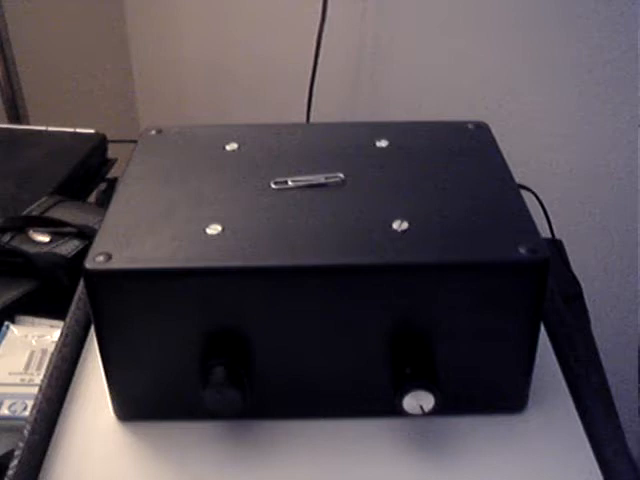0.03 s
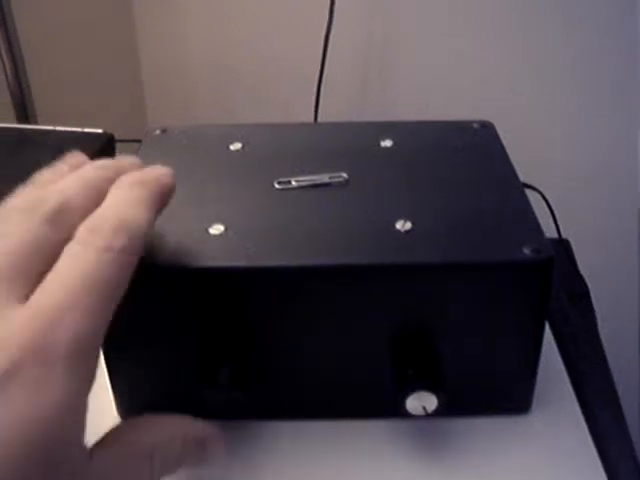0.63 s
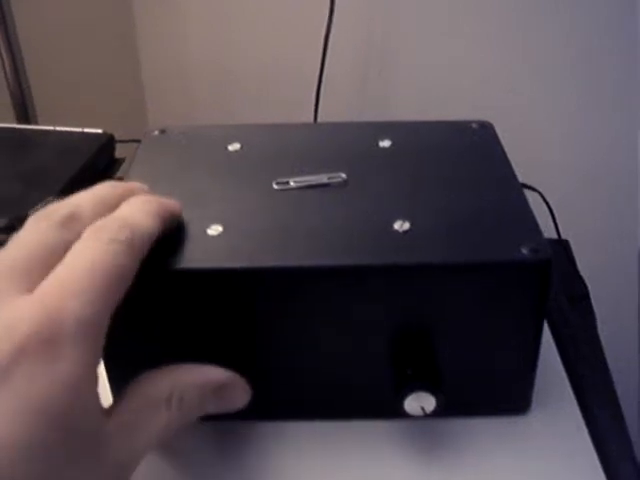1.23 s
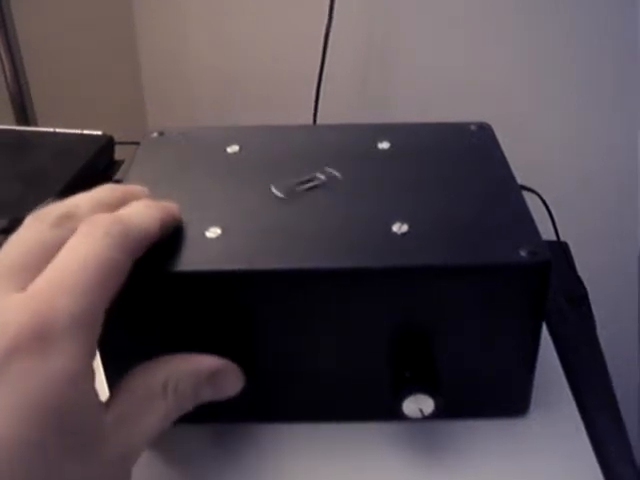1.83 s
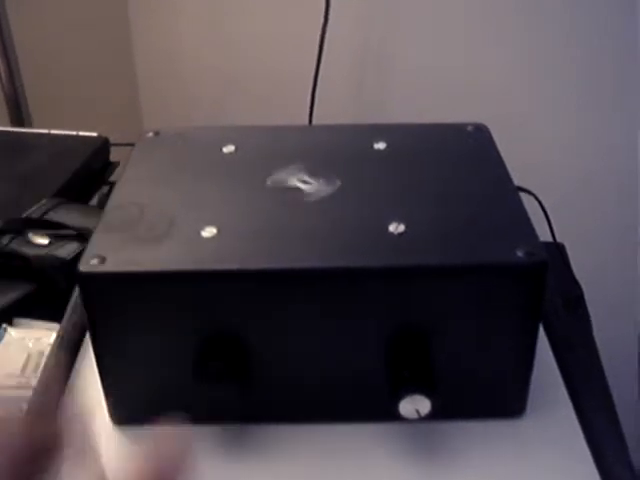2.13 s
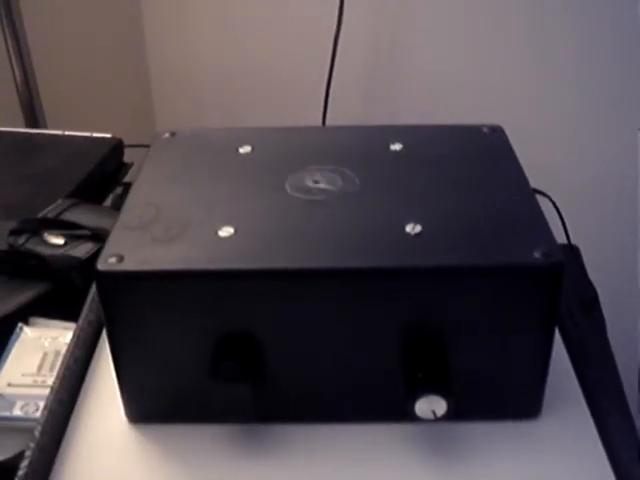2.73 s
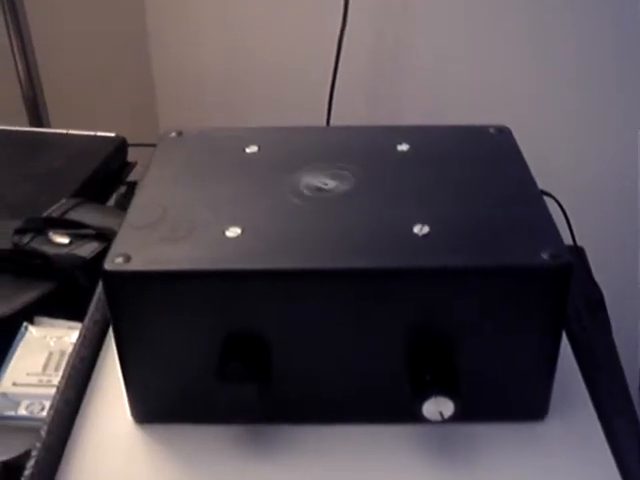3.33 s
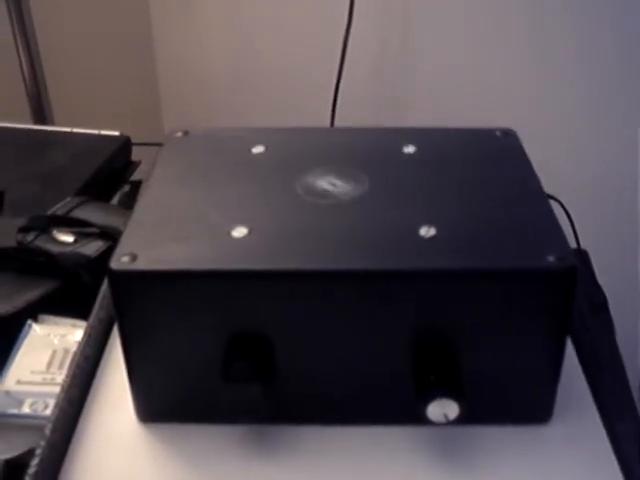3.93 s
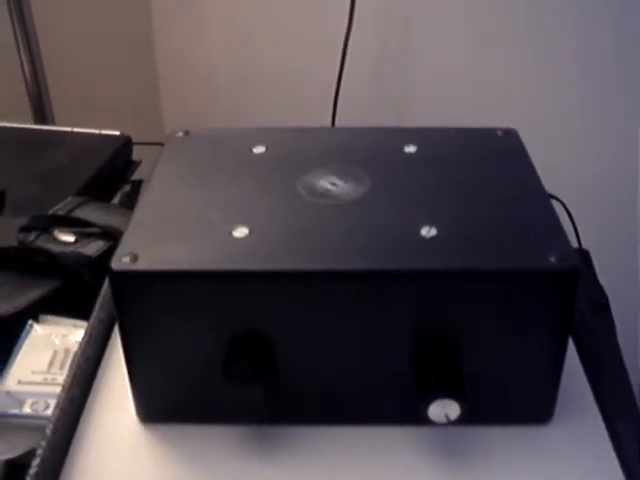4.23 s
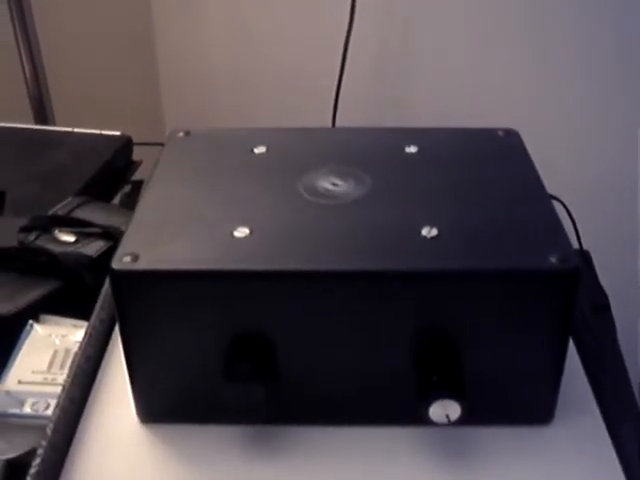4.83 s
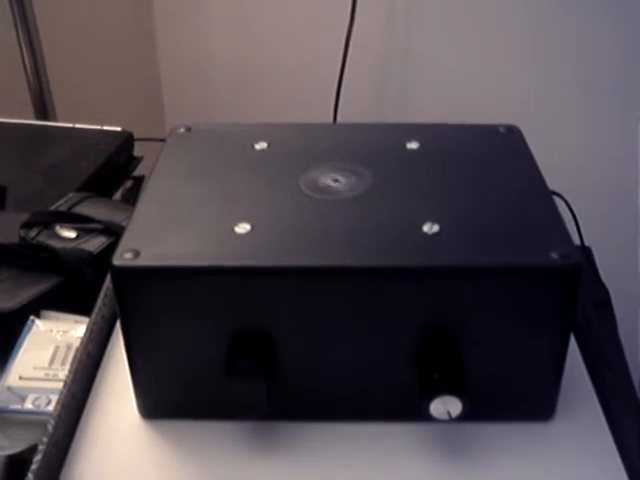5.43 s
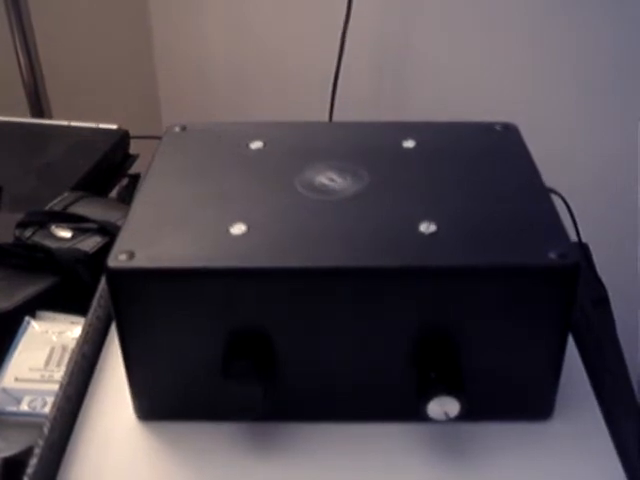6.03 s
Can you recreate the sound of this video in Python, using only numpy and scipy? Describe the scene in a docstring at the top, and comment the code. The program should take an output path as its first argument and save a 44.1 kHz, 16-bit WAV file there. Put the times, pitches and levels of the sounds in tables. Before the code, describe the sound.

A paper clip spins on a plastic box, heard through one close microphone in a small room. At first there is only fan hum, a faint knock and a brief whine. A sharp switch click starts the clip sticking and slipping, and a dull bump on the desk follows. The clip speeds up into a fluttering metallic chatter, with a passing high ring, then settles into a fast, even rattle.

```python
"""A fan and mains hum fill a small room; the desk takes a faint knock and a whine swells and fades.
Fingers brush the knob of a home-made magnetic stir plate and switch it on with a click.
A steel paper clip sticks and slips on the plastic lid, then spins free as a hand bumps the desk.
Faster and faster it scrapes and chatters into the lid's resonances, its sound swinging twice a turn,
with a high zing that comes and goes on the way up. One mono microphone stands close by."""
import sys
import numpy as np
from scipy import signal
from scipy.fft import rfft, irfft, next_fast_len
from scipy.io import wavfile
from scipy.ndimage import map_coordinates

SR = 44100
rng = np.random.default_rng(int(sys.argv[2]) if len(sys.argv) > 2 else 0)


def waveform_to_disk(signal):
    """Save audio, clipped to [-1, 1], as 16-bit WAV at the path in sys.argv[1]."""
    frames = np.transpose(np.atleast_2d(signal))
    scaled = np.clip(frames, -1, 1) * 32767
    samples = np.round(scaled).astype(np.int16)
    wavfile.write(sys.argv[1], SR, samples)


N = 272538


def paper_clip():
    """The spinning clip drives the lid and rings itself, louder and brighter as it gathers speed."""
    # Resonances of lid and box. Each row: pitch in Hz, width in Hz, relative level in dB.
    lid_modes = [(328, 64, -26.5), (417, 27.5, -15), (619.6, 47, -9.5), (772, 69, -12.5), (997, 52, -7),
                 (1069.5, 26.5, -4), (1136, 110, -10.5), (1347, 65, -1.07), (1484, 415, -7),
                 (1598, 83, -0.5), (1854, 67, -7.5), (2113, 110, -6.5), (2482, 175, -11.5), (2642, 51, -7),
                 (2905, 214, -7.5), (3150, 123, -5), (3307, 65, -5), (3790, 980, -13.5), (4340, 190, -8.0),
                 (4463, 86, -7.5), (4970, 550, -12), (5550, 174, -7.5), (5730, 430, -14), (6100, 84, -5.5),
                 (6580, 630, -13), (7816, 227, -8.5), (8470, 320, -9), (9460, 310, -11), (9924, 210, -9.5)]
    # Crossovers in Hz between five registers: low lid, middle lid, upper lid, scrape and fizz.
    crossovers = [1250, 2550, 3500, 7200]
    # How each register builds. Each row: full level in dB, knee in turns per second, steepness,
    # swell in dB, then the swell's centre and width in turns per second.
    builds = [(-35, 1.26, 1.1, 5.5, 8.6, 3.95), (-28.6, 3, 0.98, 3, 9.45, 4.9),
              (-29, 3.3, 1.28, 1.5, 8.9, 4.8), (-27, 3.3, 1.36, 1.2, 10.2, 3.5),
              (-29, 5.1, 1.68, 1.2, 11.2, 3.1)]
    stick_speed, free_speed = 0.44, 1.22  # turns per second
    speed = spin()
    contact = chatter(speed, slow_rate=200, per_turn=220, spread_db=2.5, scrape_db=-4)
    flutter = amp(0.34 * wobble(60))
    lid = unit(filtered(contact * flutter, lambda f: body(lid_modes, f)))
    # The steel wire has one narrow, ringing mode.
    knocks = chatter(speed, slow_rate=69, per_turn=60, spread_db=0, scrape_db=-4.5)
    wire = amp(-15) * unit(filtered(knocks, lambda f: body([(1622, 28, 0)], f)))
    rattle = turning(room(lid, wet_db=-11.5) + wire, speed)
    lowpassed = [filtered(rattle, lambda f: below(f, edge, order=24)) for edge in crossovers]
    registers = np.diff([np.zeros(N), *lowpassed, rattle], axis=0)
    sound = sum(unit(band) * rubbing(speed, *build) for band, build in zip(registers, builds))
    loose = np.interp(speed, [stick_speed, free_speed], [0, 1])
    drift = amp(0.48 * wobble(6))
    return sound * loose * drift


def spin():
    """Turns per second of magnet and clip: the motor gains speed quickly, then ever more slowly."""
    motor_on_s, top_speed, run_up_s = 1.64, 19.2, 2.76
    running_s = np.maximum(clock() - motor_on_s, 0)
    return top_speed * (1 - np.exp(-running_s / run_up_s))


def chatter(speed, slow_rate, per_turn, spread_db, scrape_db):
    """Tiny impacts of wire on plastic, denser with speed, over continuous scraping."""
    rate = slow_rate + per_turn * speed  # impacts per second
    hits = rng.random(N) < rate / SR
    impacts = hits * amp(spread_db * rng.standard_normal(N)) * rng.choice([-1, 1], N)
    scrape = amp(scrape_db) * rng.standard_normal(N)
    return unit(impacts / np.sqrt(rate)) + scrape


def turning(x, speed):
    # The swing across the spectrum. Each row: frequency in Hz, depth from 0 to 1, phase in cycles.
    swing = [(600, 0.18, -0.29), (980, 0.26, -0.44), (1360, 0.08, 0.36), (1840, 0.19, -0.023),
             (2100, 0.35, 0.1), (2860, 0.16, 0.42), (3070, 0.41, -0.094), (3330, 0.37, -0.21),
             (4020, 0.13, 0.49), (5830, 0.21, 0.06), (7040, 0.2, -0.39), (8950, 0.19, -0.05)]
    hz, depth, phase = np.transpose(swing)
    angle = 4 * np.pi * np.cumsum(speed) / SR
    lobe = lambda f: np.interp(f, hz, depth * np.exp(2j * np.pi * phase))
    in_phase = filtered(x, lambda f: lobe(f).real)
    quadrature = filtered(x, lambda f: lobe(f).imag)
    return x + np.cos(angle) * in_phase - np.sin(angle) * quadrature


def rubbing(speed, full_db, knee, steepness, swell_db, swell_speed, swell_width):
    growth = (speed / np.hypot(speed, knee)) ** steepness
    return growth * amp(full_db + swell_db * hump(speed, swell_speed, swell_width))


def drags():
    # The first slow drags. Each row: centre in seconds, length in seconds, level in dB.
    swells = [(1.803, .045, -34.5), (1.955, .06, -35.5), (2.14, .04, -33)]
    # The squeal of a drag. Each row: pitch in Hz, width in Hz, relative level in dB.
    squeal_modes = [(980, 19, 3), (1564, 35, -7), (1860, 40, -5), (2060, 50, -11), (4400, 91, -13)]
    slips = chatter(spin(), slow_rate=120, per_turn=52, spread_db=3, scrape_db=-6)
    return strokes(swells) * unit(filtered(slips, lambda f: body(squeal_modes, f)))


def zing():
    """The fast-sliding wire excites a pair of high modes, most strongly at one speed."""
    # The ringing pair. Each row: pitch in Hz, width in Hz, relative level in dB.
    zing_modes = [(5640, 200, 2), (5800, 48, -1.5)]
    speed = spin()
    ring = filtered(rng.standard_normal(N), lambda f: body(zing_modes, f))
    swell = amp(-31.5) * tent(speed, top=10.9, rise_db=7, fall_db=1.5)
    return swell * unit(turning(ring, speed))


def switch():
    """The switch snaps over in a few quick contacts: each is a bright tick and a ring of the case."""
    # The contacts. Each row: start in seconds, then relative levels of ring and tick in dB.
    contacts = [(1.5890, -21, -23), (1.5924, -18, 1), (1.5952, -1.5, -30.5), (1.5993, -19, -0.5),
                (1.611, -23, -29)]
    # Resonances of the case. Each row: pitch in Hz, width in Hz, relative level in dB.
    case_modes = [(70, 150, -27), (306, 36, -20), (560, 53, -14), (886, 57, 6.5), (1500, 61, -1),
                  (1750, 280, -3), (2310, 120, -2.5), (2490, 126, 1), (2850, 260, -3.5), (3650, 560, -10),
                  (4330, 260, -10), (5130, 280, -4.5), (5290, 380, -7), (5670, 400, -10.5)]
    # The colour of the tick. Each row: frequency in Hz, relative level in dB.
    tick_colour = [(200, -24), (2000, -3), (5000, -8), (7000, -13), (8400, 5), (10000, -17)]
    tick_t60_s = 0.0098
    t = np.arange(SR // 4) / SR
    ring = blow(lambda f: body(case_modes, f))
    rings, tick_envelope = np.zeros(N), np.zeros(N)
    for start, ring_db, tick_db in contacts:
        add(rings, start, amp(ring_db) * ring)
        add(tick_envelope, start, amp(tick_db - 60 * t / tick_t60_s))
    return room(rings, wet_db=-2.5) + room(0.54 * tick_envelope * noise(tick_colour), wet_db=-18)


def bumps():
    """Soft contacts of the hand ring only the low modes of the desk."""
    # The contacts. Each row: start in seconds, level in dB, cut-off in Hz (lower is softer).
    contacts = [(.1305, -25.5, 3950), (2.379, -20, 900), (2.382, -7, 1400), (2.3845, -14.5, 1300),
                (2.3889, -10, 800), (2.404, -21, 200), (2.428, -21, 200)]
    # Resonances of the desk. Each row: pitch in Hz, width in Hz, relative level in dB.
    desk_modes = [(152, 32, -15), (281, 49, -3), (430, 113, -2.5), (564, 123, 1.5), (864, 87, 7.5),
                  (1190, 130, -4.5), (1450, 260, 2)]
    thuds = np.zeros(N)
    for start, db, soft_hz in contacts:
        thud = blow(lambda f: body(desk_modes, f) / (1 + 1j * f / soft_hz) ** 2)
        add(thuds, start, amp(db) * thud)
    return room(thuds, wet_db=-12)


def fingers():
    """Skin slides on the knob with a faint hiss."""
    # The brushes. Each row: centre in seconds, length in seconds, level in dB.
    brushes = [(.835, .09, -52), (1.02, .07, -54)]
    return strokes(brushes) * noise([(200, -16), (1500, 1), (4000, 0.5), (10000, -8)])


def background():
    """Fan noise and hum, a fading whine, a thin high whistle and a soft low throb about twice a second."""
    # The colour of the fan's air. Each row: frequency in Hz, relative level in dB.
    air_colour = [(20, -44.5), (45, -22), (64, -14), (92, -34.5), (130, -9.5), (300, -4), (450, -5),
                  (750, -3.5), (1050, -5.5), (1380, -8.5), (1650, -15), (4000, -21.5), (6200, -28),
                  (8100, -27), (10000, -33.5)]
    # Steady tones of fan and mains. Each row: pitch in Hz, relative level in dB.
    hum_tones = [(60, -74.5), (139.5, -62.5), (175.0, -62.5), (209.0, -57.5), (278.5, -63), (288.0, -51.5),
                 (314.5, -53.5), (327.0, -60.5), (348.0, -60.5), (370.5, -59.5), (487.0, -60), (539.0, -57),
                 (552.5, -62.5), (576.0, -51), (615.5, -62), (629.0, -54), (654.5, -58.5), (686.0, -64),
                 (696.0, -61.5), (719.0, -52.5), (857.0, -61), (1258.5, -60)]
    # Whine tones that swell in turn. Each row: pitch in Hz, peak level in dB, peak time in seconds.
    whine_tones = [(824, -50, 0.68), (1112, -48.5, 0.44), (1374, -45, 0.38)]
    # The electrical whistle. Each row: pitch in Hz, level in dB.
    whistle_tones = [(7951, -83), (8008, -67.5), (8040, -75)]
    t = clock()
    air = amp(-44) * noise(air_colour)
    hum = amp(-0.5) * tones(hum_tones, waver=0.58)
    whine = sum(tent(t, peak_s, rise_db=34, fall_db=40) * tones([(hz, db)], waver=0.4)
                for hz, db, peak_s in whine_tones)
    whistle = tones(whistle_tones, waver=0.94)
    throb_hz, period_s = 68, 0.508
    beat = np.cos(np.pi * (t - 0.12) / period_s) ** 8
    throb = amp(-61) * beat * np.sin(2 * np.pi * throb_hz * t)
    return air + hum + whine + whistle + throb


def room(x, wet_db):
    """The direct sound and a short diffuse tail in which the treble dies first."""
    # The room's decay. Each row: frequency in Hz, seconds to fall by 60 dB.
    decay_times = [(150, 0.9), (1000, 0.23), (3000, 0.23), (10000, 0.18)]
    hz, t, spectra = signal.stft(rng.standard_normal(SR // 2), SR, nperseg=256)
    decay = amp(-60 * t / along(decay_times, hz)[:, None])
    tail = signal.istft(spectra * decay, SR, nperseg=256)[1]
    tail = np.pad(tail / np.linalg.norm(tail), (SR // 200, 0))  # 5 ms of pre-delay
    return x + amp(wet_db) * signal.fftconvolve(x, tail)[:N]


def tones(lines, waver):
    """Sines from (Hz, dB) rows; their level wanders a little, their phase by about waver radians."""
    return sum(amp(db + 1.94 * wobble(4)) * np.sqrt(2)
               * np.sin(2 * np.pi * hz * clock() + waver * wobble(5)) for hz, db in lines)


def noise(spectrum):
    """Noise of rms 1, coloured by (Hz, dB) points."""
    return unit(filtered(rng.standard_normal(N), lambda hz: amp(along(spectrum, hz))))


def body(modes, f):
    """Response of a set of (Hz, width in Hz, dB) resonances of alternating polarity."""
    return sum((-1) ** k * amp(db) * 1j * f * width / (hz * hz - f * f + 1j * f * width)
               for k, (hz, width, db) in enumerate(modes))


def blow(response):
    """What one short push rings, with peak 1."""
    ring = filtered(signal.unit_impulse(SR // 4), response)
    return ring / np.abs(ring).max()


def filtered(x, response):
    """Shape a sound with a complex response of frequency."""
    size = next_fast_len(len(x) + SR // 4, True)
    hz = np.fft.rfftfreq(size, 1 / SR)
    return irfft(rfft(x, size) * response(hz), size)[:len(x)]


def below(f, edge_hz, order):
    """Low-pass gain."""
    return 1 / (1 + (f / edge_hz) ** order)


def strokes(rows):
    """One soft swell for each row of centre, length and level."""
    return sum(amp(db) * hump(clock(), centre_s, length_s) for centre_s, length_s, db in rows)


def hump(x, centre, width):
    """A bell of height 1; width spans about its upper two thirds."""
    return np.exp(-(2 * (x - centre) / width) ** 2)


def tent(x, top, rise_db, fall_db):
    """A gain that climbs to 1 at x = top and falls again, by so many dB per unit of x."""
    return amp(-rise_db * np.maximum(top - x, 0) - fall_db * np.maximum(x - top, 0))


def wobble(rate):
    """A smooth random curve, rate knots a second."""
    knots = rng.standard_normal(int(N * rate / SR) + 4)
    return map_coordinates(knots, [clock() * rate])


def along(points, hz):
    """(Hz, value) points read on a log axis."""
    frequencies, values = np.transpose(points)
    return np.interp(np.log(hz + 1), np.log(frequencies + 1), values)


def add(track, start_s, sound):
    """Mix a sound into a track."""
    track[round(start_s * SR):][:len(sound)] += sound


def amp(db):
    """Decibels to gain."""
    return 10 ** (np.asarray(db) / 20)


def unit(x):
    """Scale to rms 1."""
    return x / np.sqrt(np.mean(x ** 2) + 1e-20)


def clock():
    """Time of every sample in seconds."""
    return np.arange(N) / SR


def scene():
    """All sources reach one microphone, heard on both channels."""
    mono = paper_clip() + drags() + zing() + switch() + bumps() + fingers() + background()
    return np.array([mono, mono])


def record(dry):
    """The sound cuts in after a moment; the microphone rounds off peaks and the top treble is cut."""
    start_s, ceiling_db, top_hz = 0.079, -2.5, 10080
    opened = dry * (clock() > start_s)
    rounded = opened / (1 + (opened / amp(ceiling_db)) ** 6) ** (1 / 6)
    return np.array([filtered(x, lambda f: below(f, top_hz, order=300)) for x in rounded])


dry = scene()
out = record(dry)
waveform_to_disk(out)
```